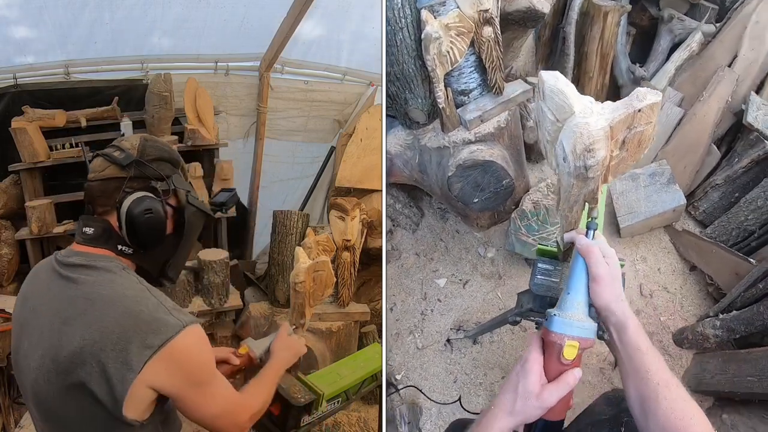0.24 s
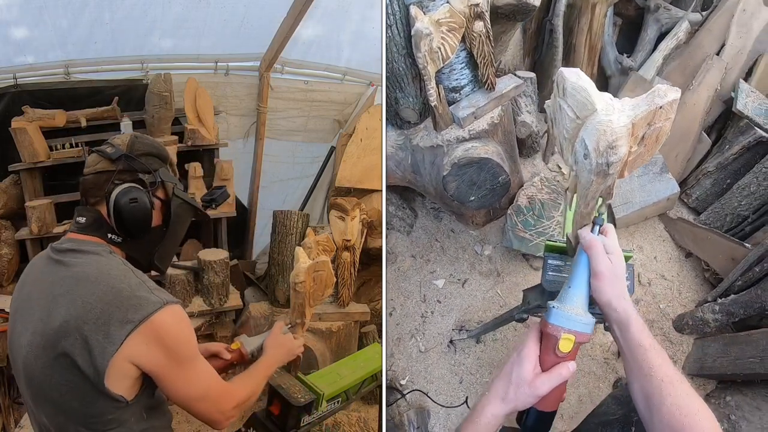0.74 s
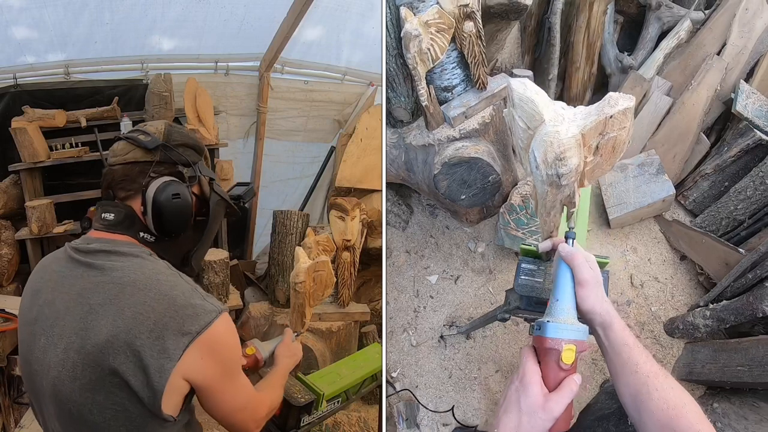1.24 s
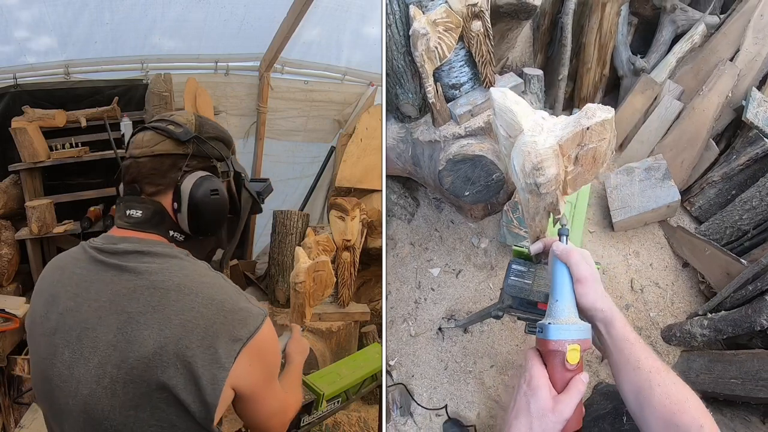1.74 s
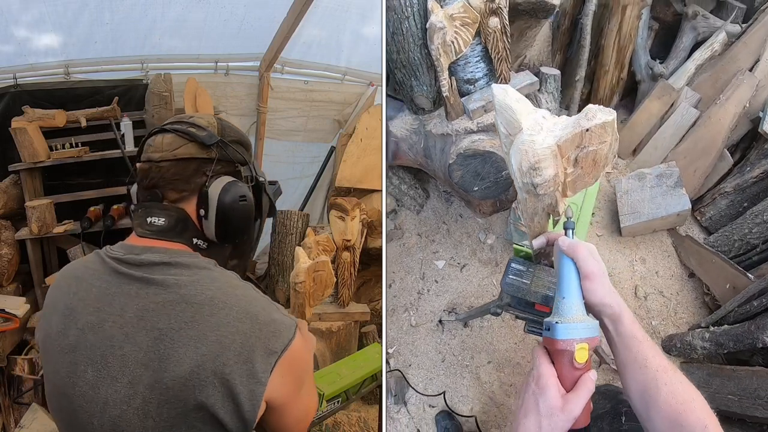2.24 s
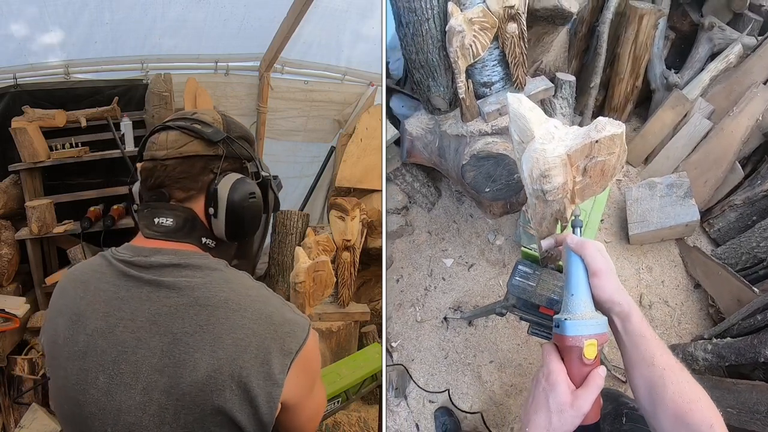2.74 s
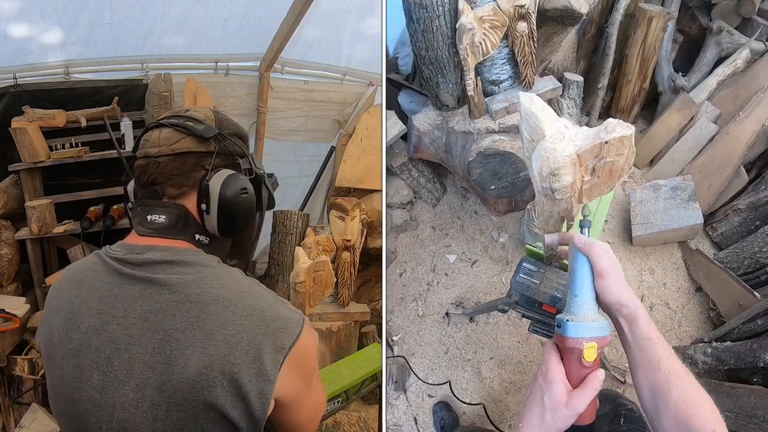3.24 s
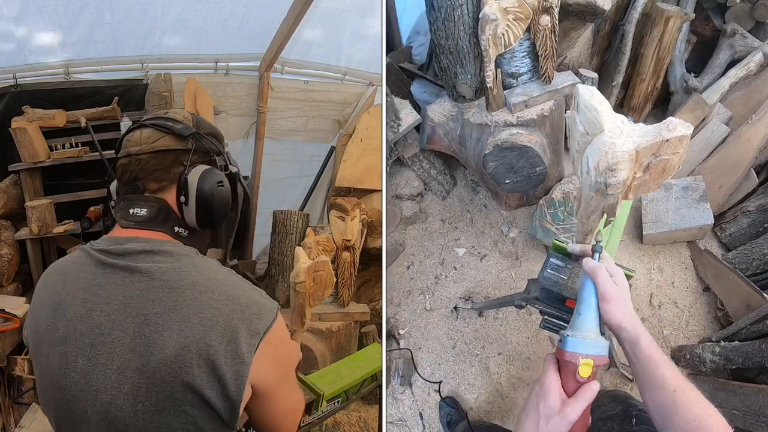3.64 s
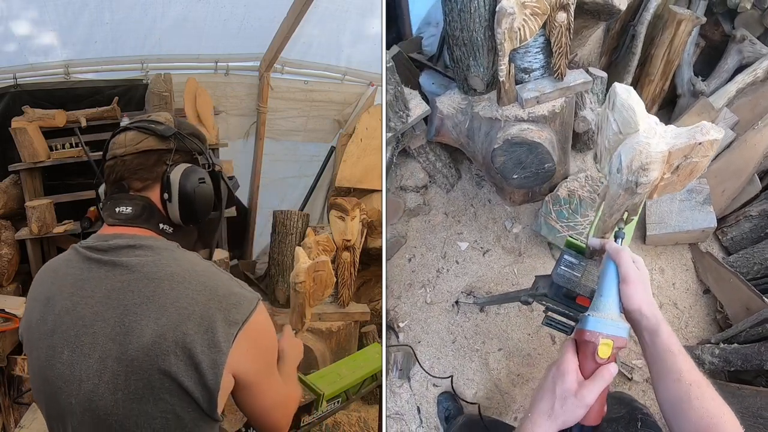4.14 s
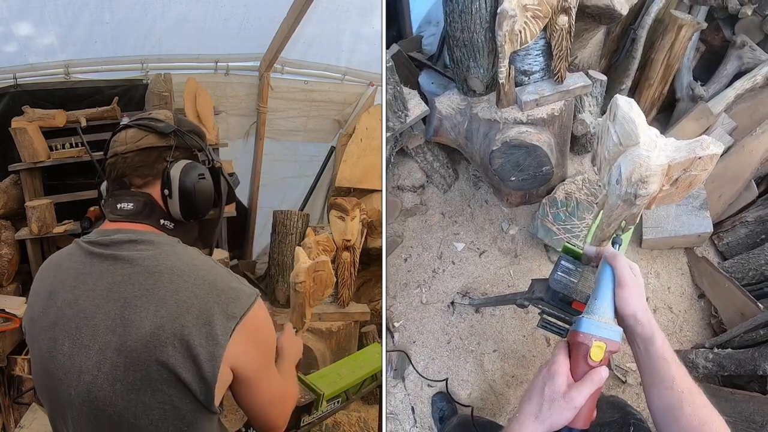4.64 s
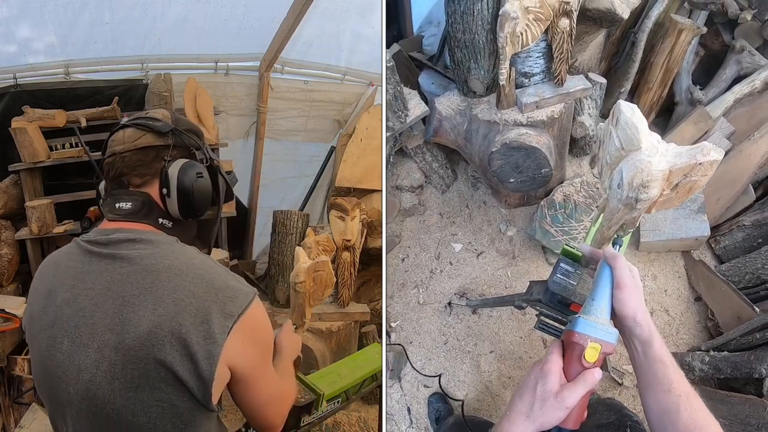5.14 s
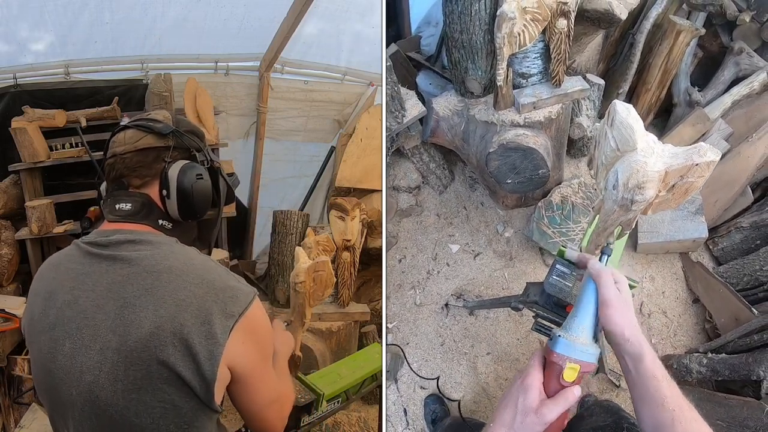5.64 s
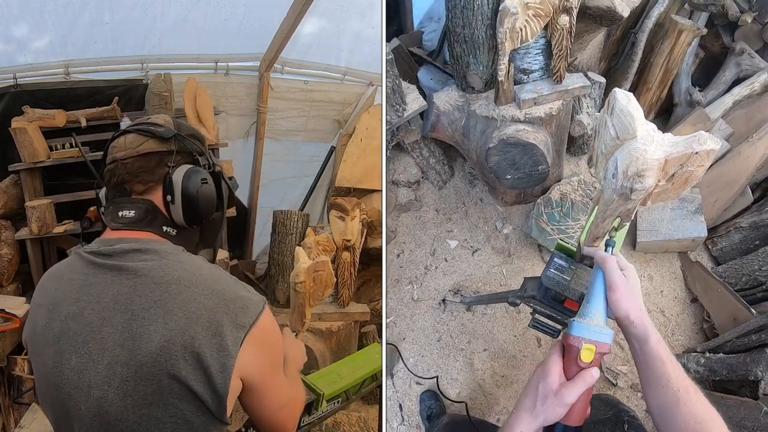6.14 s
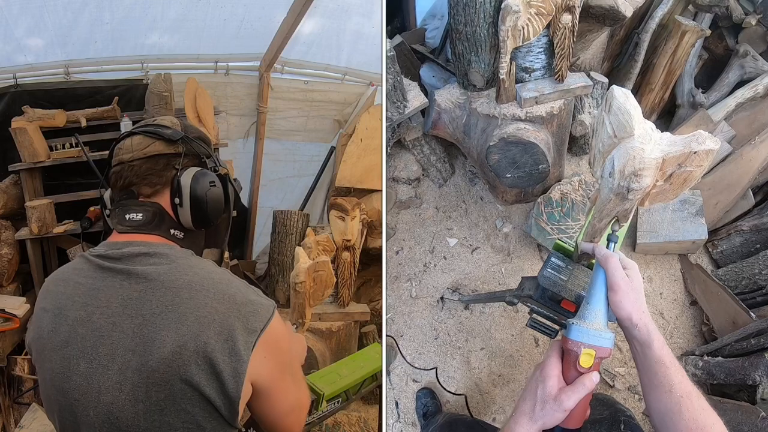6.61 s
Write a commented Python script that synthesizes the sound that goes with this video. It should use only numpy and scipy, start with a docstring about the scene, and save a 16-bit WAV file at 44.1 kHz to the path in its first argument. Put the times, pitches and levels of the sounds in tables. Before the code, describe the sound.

An electric die grinder carves wood close by in a workshop tent, running without a break: a steady motor hum under a hiss of rushing air and rasping dust. Quick, shrill bites of the burr sound in the first half second. From about 1.1 to 2.1 seconds come loud, stuttering bites that sing with a high whine. Lighter, thin chatter follows until about 4 seconds, the pitch sagging near 3 seconds and climbing back. From 4 to 5.3 seconds short bites merge into a long cut that drags the pitch to its lowest. The motor runs more freely and recovers, then a sharp bite at 6 seconds starts a series of short ones lasting to the end, near 6.9 seconds. The whole sound dips slightly under each loud bite.

```python
"""An electric die grinder carves wood in a workshop tent. From the start its shaft hums, cooling air rushes
through the casing, and each bite of the six-fluted burr (the cutter) sings at multiples of the turning
rate, mostly the sixth. Loud bites come at 1-2 s, then light chatter as the speed sags under load and
recovers. A long cut at 4-5.3 s slows the shaft most; short bites follow from about 6 s. Throughout, an
automatic gain control turns the sound down under each loud bite."""
import sys
import numpy as np
from scipy import signal
from scipy.fft import rfft, irfft, next_fast_len
from scipy.io import wavfile
from scipy.ndimage import uniform_filter1d

SR = 44100
rng = np.random.default_rng(int(sys.argv[2]) if len(sys.argv) > 2 else 0)


def wav_out(sig):
    """Save sig, one row per channel (or a flat mono array), as 16-bit PCM at SR to the path in sys.argv[1]."""
    wavfile.write(sys.argv[1], SR, np.round(np.clip(np.atleast_2d(sig).T, -1, 1) * 32767).astype(np.int16))


N = 302967
STEP = 40  # samples between the points of a slow control curve
TIMES = np.arange(N // STEP + 2) * STEP / SR  # those points, in seconds

# rush of air and dust: (time [s], low range [dB], middle range [dB], high range [dB])
AIR_LEVELS = [(0.0, -42.5, -38.5, -38.5), (.3, -39, -34, -37), (.55, -40, -35.5, -38.5),
              (.76, -42, -38.5, -41), (1.09, -38.5, -35, -36.5), (1.14, -40.5, -34, -34.5),
              (1.3, -38, -33.5, -35), (1.9, -40, -35.5, -37), (2.3, -41, -37.5, -39.5),
              (2.7, -41.5, -38.5, -39.5), (3.0, -39, -37.5, -39), (3.4, -40, -38, -39.5),
              (3.85, -38, -35.5, -37.5), (4.36, -38, -33.5, -35), (4.45, -40, -35.5, -37.5),
              (4.9, -41, -39.5, -39.5), (5.2, -41, -37.5, -38), (5.42, -42, -39, -40.5),
              (5.62, -42.5, -41.5, -43.5), (5.93, -41.5, -36.5, -37.5), (6.4, -40.5, -36.5, -38.5),
              (6.87, -41, -37.5, -39)]


def amp(db):
    """Turn decibels into a gain to multiply by."""
    return 10 ** (np.asarray(db) / 20)


def in_time(rows):
    """Join the rows of a table with straight lines: one control curve for each column after the time."""
    times, *columns = np.transpose(rows)
    return [np.interp(TIMES, times, column) for column in columns]


def at_hz(points, hz):
    """Read a table of (frequency, value), giving each octave equal room."""
    known_hz, values = np.transpose(points)
    return np.interp(np.log(hz), np.log(known_hz), values)


def per_sample(control):
    """Fill in a control curve so that every sample has a value."""
    return np.interp(np.arange(N) / STEP, np.arange(len(TIMES)), control)


def drift(rate):
    """A random curve of typical size 1 that changes about `rate` times a second."""
    r = np.exp(-2 * np.pi * STEP * rate / SR)
    slow = signal.lfilter([1], [1, -2 * r, r * r], rng.standard_normal(len(TIMES) + 2000))[2000:]
    return slow / np.sqrt(np.mean(slow ** 2))


def swell(middle, length):
    """A curve that rises to 1, stays flat and falls again."""
    return np.exp(-(2 * (TIMES - middle) / length) ** 4)


def casing_db(hz):
    """The casing resonates: it boosts sound near certain frequencies."""
    # resonances: (frequency [Hz], width [Hz], boost [dB])
    resonances = [(770, 90, 8), (1060, 90, 4), (1360, 110, 5), (1670, 100, 4), (2090, 90, 3),
                  (2900, 900, 3), (8100, 450, 4), (9650, 400, 3)]
    return sum(db / (1 + (2 * (hz - centre) / width) ** 2) for centre, width, db in resonances)


def air_spectra(hz, size):
    """Left and right spectra of swirling air: random noise coloured by the casing."""
    # colour of the rush: (frequency [Hz], relative level [dB])
    colour = [(25, -39.5), (80, -32), (130, -34.5), (400, -26.5), (540, -27), (640, -22), (1000, -16),
              (3300, -14), (4800, -7.5), (6400, -8), (8000, -6.5), (9900, -11.5), (10500, -21),
              (11300, -19), (13000, -25), (13300, -28), (14800, -33)]
    # how alike left and right are: (frequency [Hz], likeness [0 to 1])
    likeness = [(60, 0.98), (130, 0.85), (290, 0.89), (630, 0.7), (1380, 0.4), (3010, 0.84), (6590, 0.17),
                (14400, 0.055)]
    # which side is louder: (frequency [Hz], left minus right [dB])
    balance = [(60, 1), (130, -0.5), (290, -0.5), (630, -2), (1380, -2.5), (3010, 0), (6590, -1),
               (14400, 1)]
    shared, apart = rfft(rng.standard_normal((2, size))) * amp(at_hz(colour, hz) + casing_db(hz))
    alike = at_hz(likeness, hz)
    shared, apart = np.sqrt(1 + alike) * shared, np.sqrt(1 - alike) * apart
    lean = amp(at_hz(balance, hz) / 2)
    return np.array([(shared + apart) * lean, (shared - apart) / lean])


def air_rush(flicker_db=1.37, top_share=0.63):
    """Rushing air and rasping dust over a low rumble, in half-octave bands that each flicker."""
    # rumble of the surroundings: (time [s], level [dB])
    rumble = [(0.0, -63.5), (2.5, -67.5), (4.0, -66), (6.87, -72)]
    # extra fullness of the rasp near 0.6-1.1 and 3.2 kHz: (time [s], boost [dB])
    body = [(1.1, 3.5), (1.3, 0.5), (6.87, 1)]
    body_db, = in_time(body)
    _, _, top_db = strokes()
    size = next_fast_len(N)
    hz = np.maximum(np.fft.rfftfreq(size, 1 / SR), 1)
    spectra = air_spectra(hz, size)
    band_position = np.clip(2 * np.log2(hz / 200), 0, 12)
    ranges, split_hz = np.zeros((4, 2, N)), (220, 2100, 4300)  # rumble, low, middle, high
    common_flicker = 0.13 * drift(20)
    for k in range(13):
        band = irfft(spectra * np.maximum(1 - np.abs(band_position - k), 0), size)[:, :N]
        band_db = flicker_db * (common_flicker + drift(22.4))
        band_db += top_share * top_db * (k == 12) + body_db * (k in (3, 4, 5, 8))
        ranges[np.searchsorted(split_hz, 200 * 2 ** (k / 2))] += band * per_sample(amp(band_db))
    rumble_db = in_time(rumble)[0] + 0.41 * drift(17)
    # a clean, singing cut takes the place of some of the rasp
    rasp_db = [db - share * singing_db() for db, share in zip(in_time(AIR_LEVELS), (0.03, 0.12, 0.09))]
    return sum(per_sample(amp(db)) * noise / np.std(noise.mean(0))
               for db, noise in zip([rumble_db, *rasp_db], ranges))


def wood_hum():
    """The clamped piece of wood hums briefly at a low resonance."""
    # hums: (middle [s], length [s], pitch [Hz], level [dB])
    hums = [(0.31, 0.056, 343, -56.5), (1.785, 0.15, 356, -55), (5.198, 0.33, 357, -56.5)]
    t = np.arange(N) / SR
    return sum(np.sqrt(2) * amp(db) * per_sample(swell(middle, length)) * np.sin(2 * np.pi * hz * t)
               for middle, length, hz, db in hums)


def shaft_hz():
    """The turning rate, which sags under load and recovers."""
    # shaft speed: (time [s], turns per second [Hz])
    speed = [(0.0, 464), (0.2, 464.7), (0.47, 467.6), (0.6, 469.8), (0.99, 481.3), (1.13, 483.3),
             (1.4, 481), (1.87, 472.5), (2.14, 474.2), (2.36, 479.2), (2.52, 474.4), (2.82, 457.4),
             (3.01, 451.6), (3.15, 456), (3.42, 471), (3.66, 479.8), (3.95, 485.9), (4.26, 487.3),
             (4.4, 483), (4.76, 456.9), (5.08, 447.6), (5.29, 438), (5.46, 443.3), (5.72, 463.4),
             (5.93, 474.3), (6.18, 479.6), (6.47, 478.1), (6.87, 481)]
    return in_time(speed)[0]


def shaft_tone(multiple, gain, lean_db, waver_db, flutter_rad, roam_rad=0.35):
    """A wavering tone at a multiple of the turning rate; lean_db is left minus right."""
    hz = multiple * shaft_hz()
    peak = np.sqrt(2) * gain * amp(waver_db * drift(20))
    phase = 2 * np.pi * np.cumsum(hz) * STEP / SR
    phase += flutter_rad * drift(20) + rng.uniform(0, 2 * np.pi)
    # reflections put left and right out of step, more so for high tones
    phase_gap = 0.29 + np.minimum(hz / 6500, 1) ** 2 * (1 + roam_rad * drift(3))
    return np.array([per_sample(peak * amp(side * lean_db)) * np.sin(per_sample(phase - side * phase_gap))
                     for side in (0.5, -0.5)])


def flare_up(multiple, gain):
    """Raise a tone's gain at the moments when it briefly stands out."""
    # flares: (middle [s], length [s], multiple of the turning rate, level [dB])
    flares = [(0.194, .08, 14, -44), (0.301, 0.12, 14, -39), (0.47, .1, 14, -40), (0.21, 0.077, 11, -43),
              (.375, .025, 16, -36), (.4, 0.039, 11, -43), (.31, .1, 11, -47), (0.592, 0.012, 9, -33),
              (1.248, 0.19, 10, -42.5), (1.2, 0.15, 15, -42), (1.195, .05, 12, -37), (1.42, .06, 17, -38),
              (1.5, .04, 17, -41), (1.6, 0.038, 17, -36), (4.47, .1, 11, -43), (4.777, .25, 16, -41),
              (4.797, 0.087, 21, -43), (1.212, 0.1, 13, -41), (1.53, 0.12, 16, -38), (1.725, .045, 16, -39),
              (1.813, 0.1, 16, -40), (2.055, 0.027, 16, -39), (2.303, .045, 9, -41.5), (2.586, .1, 17, -43),
              (2.775, 0.18, 20, -46), (2.83, 0.041, 18, -37), (3.066, 0.039, 18, -36.5),
              (3.895, 0.22, 11, -45.5), (1.949, 0.015, 9, -31), (1.967, 0.011, 3, -35.5),
              (1.588, 0.055, 9, -38.5), (2.933, 0.048, 16, -40), (4.038, 0.04, 16, -32.5),
              (4.04, 0.034, 15, -38), (4.25, 0.02, 12, -33), (4.392, .03, 11, -35), (4.368, 0.041, 16, -31),
              (4.467, .07, 9, -36), (4.603, 0.14, 9, -37.5), (4.804, 0.16, 9, -43),
              (4.708, 0.14, 18, -37.5), (4.83, 0.044, 18, -39), (4.932, 0.61, 11, -45),
              (4.986, 0.16, 16, -44), (5.025, .25, 18, -44), (5.04, .08, 22, -45), (5.045, .07, 17, -48),
              (5.055, .06, 13, -44), (5.222, 0.055, 18, -40), (5.257, .07, 15, -37.5),
              (5.196, 0.067, 13, -39), (5.902, 0.048, 9, -40), (5.98, 0.031, 14, -34),
              (5.975, 0.023, 9, -33), (6.0, .02, 11, -32), (6.185, 0.05, 9, -36), (6.195, .1, 12, -42),
              (6.205, .035, 20, -41), (6.443, 0.021, 13, -38), (6.15, .09, 10, -46), (6.15, .07, 13, -47),
              (6.28, .15, 10, -46), (6.67, .04, 13, -46), (6.77, .07, 10, -49), (6.39, .05, 13, -45),
              (6.43, .03, 12, -42), (6.55, .08, 10, -46), (6.696, .07, 12, -45), (6.147, 0.056, 16, -28),
              (6.266, 0.084, 17, -38), (6.347, 0.043, 16, -32.5)]
    for middle, length, k, db in flares:
        if round(k) == multiple:
            gain = np.maximum(gain, amp(db) * swell(middle, length))
    return gain


def fan_whistle(multiple=27, vent_hz=13050, width_hz=1200):
    """The fan blades whistle faintly, best near a resonance of the vent."""
    high_rush_db = in_time(AIR_LEVELS)[-1]
    off_resonance = 2 * (multiple * shaft_hz() - vent_hz) / width_hz
    gain = amp(high_rush_db - 21) / (1 + off_resonance ** 2)
    return shaft_tone(multiple, gain, lean_db=3, waver_db=2, flutter_rad=0.2, roam_rad=0.2)


def motor_hum(third_db=-52):
    """The slightly unbalanced shaft shakes once a turn: a hum with its 2nd to 4th multiples."""
    # motor tones: (time [s], hum [dB], 2nd multiple [dB], 4th multiple [dB])
    motor_levels = [(0.0, -51.5, -48, -67), (.2, -44, -41, -44), (0.52, -38.5, -40.5, -65),
                    (0.58, -48, -51, -46.5), (1.07, -45.5, -48.5, -47), (1.3, -48, -46.5, -50),
                    (1.9, -48, -52, -51), (2.79, -48, -47.5, -48), (3.08, -43.5, -52, -50.5),
                    (3.81, -44, -49.5, -43.5), (4.59, -50.5, -51.5, -49), (5.07, -44, -57.5, -45.5),
                    (5.37, -45, -53, -51), (5.9, -47.5, -51.5, -73), (6.87, -47, -46, -50)]
    hum, second, fourth = in_time([(time, *amp(levels_db)) for time, *levels_db in motor_levels])
    sound = shaft_tone(1, hum, lean_db=1.5, waver_db=1.13, flutter_rad=0.011)
    for k, gain in ((2, second), (3, flare_up(3, amp(third_db))), (4, fourth)):
        sound += shaft_tone(k, gain, lean_db=-1.6 + 1.3 * drift(2.2), waver_db=3.5, flutter_rad=0.5)
    return sound


def strokes():
    """The burr strokes along the wood: curves in dB for its light touch, chatter and extra treble."""
    # strokes: (start [s], end [s], touch between bites [dB], chatter boost [dB], treble boost [dB])
    contacts = [(0.0, 0.548, -58, -4, 0), (1.107, 1.348, -41, 1.5, 0), (1.36, 1.89, -47, -1, 2),
                (1.943, 2.18, -57, -2.5, -0.5), (2.397, 3.18, -51, -0.5, 5), (3.2, 3.95, -52, -3.5, 2),
                (3.952, 4.375, -52, -1, 2.5), (4.35, 4.798, -44, 1, 2.5), (4.794, 5.305, -45, 1, 3),
                (5.962, 6.008, -38, 10, 0), (6.11, 6.466, -45.5, 0, 5), (6.468, 6.9, -57, -3.5, 0)]
    levels_db = np.outer([-57, -9, 0], np.ones(len(TIMES)))  # the levels between strokes
    for start, end, *stroke_db in contacts:
        levels_db[:, (TIMES >= start) & (TIMES < end)] = np.c_[stroke_db]
    return uniform_filter1d(levels_db, size=15)


def burr_chatter(gains, bite_share=0.23, wander_db=2.6):
    """High multiples come and go as the contact wanders over the flutes, and rise with each bite."""
    # one value for each multiple from the 9th upward: (base level [dB])
    chatter_levels = [-51, -54, -55, -55.5, -55.5, -58, -57.5, -54.5, -56.5, -57.5, -60, -58, -60.5, -65,
                      -67, -69, -70, -71, -72]
    touch_db, boost_db, top_db = strokes()
    bite_rise = sum(gains.values()) / len(gains) / amp(touch_db)
    strength = amp(boost_db) * bite_rise ** bite_share
    sound = np.zeros((2, N))
    for k, base_db in enumerate(chatter_levels, 9):
        level_db = base_db + casing_db(k * shaft_hz()) + top_db * min((k - 9) / 12, 1)
        gain = flare_up(k, strength * amp(level_db + wander_db * drift(9)))
        sound += shaft_tone(k, gain, lean_db=-1.6 + 1.3 * drift(2.2), waver_db=1.9, flutter_rad=0.25)
    return sound


def bite_power(ring_s=0.0098, fall_db=19):
    """Power of the 5th to 8th multiples: each bite swells around its leading multiple and rings out."""
    # bites into the wood: (middle [s], length [s], level [dB], leading multiple of the turning rate)
    bites = [(0.038, 0.073, -32.5, 6), (.158, .045, -39, 5.6), (.05, 0.13, -42, 5),
             (0.124, 0.028, -30, 5.8), (0.198, 0.079, -33.5, 5), (0.258, 0.046, -31, 6),
             (0.292, .04, -36, 5), (0.397, .07, -40, 5), (0.34, 0.075, -29.5, 5.8),
             (0.407, 0.013, -27.5, 5.8), (0.438, 0.059, -22, 5.45), (0.48, 0.022, -30, 5.9),
             (0.52, 0.011, -28.5, 6), (1.13, 0.016, -16, 6.3), (1.17, 0.025, -20.5, 6.2),
             (1.22, 0.04, -37, 8), (1.25, 0.097, -19.5, 5.8), (1.308, 0.022, -32.5, 8),
             (1.359, 0.031, -18, 5.8), (1.433, 0.14, -22, 5.5), (1.445, .05, -37, 8),
             (1.528, 0.071, -28.5, 6), (1.58, 0.12, -38.5, 5), (1.596, 0.027, -24.5, 6),
             (1.658, 0.042, -26.5, 6), (1.764, 0.13, -23.5, 5.7), (1.863, 0.05, -28, 5.5),
             (1.959, 0.02, -30.5, 5), (1.983, 0.027, -24.5, 6), (2.069, 0.07, -20.5, 6.2),
             (2.12, 0.04, -31, 6), (2.297, 0.019, -34.5, 6), (3.014, 0.085, -41, 5), (3.964, .02, -35.5, 6),
             (4.02, .03, -40, 5), (4.022, 0.014, -39, 8), (4.045, 0.023, -30, 6), (4.072, 0.025, -35, 6),
             (4.167, .03, -35, 6.5), (4.256, 0.015, -25.5, 6.2), (4.305, 0.013, -30, 6),
             (4.352, .02, -33, 8), (4.377, 0.01, -25, 6), (4.409, 0.032, -23, 5.4), (4.403, 0.018, -27, 8),
             (4.442, 0.077, -27, 6), (4.446, 0.063, -36, 7), (4.49, 0.16, -37, 5), (4.562, 0.16, -43, 8),
             (4.578, .1, -40, 7), (4.722, .045, -33.5, 8), (4.643, 0.29, -24, 6), (4.632, 0.057, -30.5, 5),
             (4.81, 0.12, -24.5, 6.3), (4.918, 0.12, -21, 6.5), (5, 0.18, -28, 7.2), (5.1, 0.11, -36, 6),
             (5.167, 0.13, -38, 8), (5.226, 0.16, -40, 6), (5.145, 0.064, -27, 7.3),
             (5.227, 0.073, -25, 7.2), (5.88, 0.0098, -30, 5.1), (5.993, 0.02, -14.5, 6.5),
             (6.12, 0.023, -36, 5.3), (6.163, 0.068, -24, 7.9), (6.27, 0.15, -46, 7), (6.64, .14, -52, 7),
             (6.273, 0.062, -36, 5), (6.37, 0.017, -33, 5), (6.177, 0.02, -30, 6), (6.131, 0.024, -34.5, 6),
             (6.235, 0.017, -28.5, 6), (6.29, 0.054, -30, 6.1), (6.267, 0.13, -35, 8),
             (6.393, 0.029, -27, 5.9), (6.447, 0.023, -23.5, 5.6), (6.56, 0.1, -31, 5.2),
             (6.536, 0.04, -42, 6), (6.582, 0.021, -33, 6), (6.65, 0.055, -44, 6), (6.696, 0.033, -33, 6),
             (6.798, 0.05, -33.5, 5.5), (6.86, 0.023, -27, 6)]
    power = dict.fromkeys(range(5, 9), 1e-12)
    decay = np.exp(-STEP / (ring_s * SR))
    for middle, length, level_db, lead in bites:
        shape = swell(middle, length) ** 2
        shape = np.maximum(shape, signal.lfilter([1 - decay], [1, -decay], shape))
        for k in power:
            power[k] += shape * amp(level_db - fall_db * abs(k - lead)) ** 2
    return power


def singing_db(threshold_db=-42):
    """How far the bites rise above the level where the cut starts to sing cleanly."""
    power = uniform_filter1d(sum(bite_power().values()), size=60)
    return np.maximum(10 * np.log10(power + 1e-12) - threshold_db, 0)


def bite_gains(stutter_db=1.3):
    """Gain of each singing multiple: bites plus the light touch, stuttering as the burr grabs and slips."""
    touch_db, _, _ = strokes()
    power = {k: bite + amp(touch_db + 2.5 * drift(12)) ** 2 for k, bite in bite_power().items()}
    common_stutter = amp(stutter_db * drift(60))
    return {k: common_stutter * amp(stutter_db * drift(30)) * np.sqrt(power[k]) for k in power}


def burr_song(gains):
    """Six flutes (cutting edges) strike the wood each turn; being uneven, they sound nearby multiples too."""
    sound = np.zeros((2, N))
    for k, gain in gains.items():
        # a light touch skips and breaks the tone up, a firm cut holds it steady
        waver_db = 0.8 + 4 / (1 + (gain / amp(-49)) ** 2)
        sound += shaft_tone(k, gain, lean_db=-2.8, waver_db=waver_db, flutter_rad=0.12)
    return sound


def gain_control(sound, threshold_db=-32.5, share=0.46, attack_s=0.004, release_db_per_s=21):
    """Loudness above the threshold pulls the gain down quickly; it creeps back at a steady rate."""
    level_db = 10 * np.log10(uniform_filter1d(np.mean(sound ** 2, axis=0), size=441) + 1e-12)
    cut_db = share * np.maximum(level_db - threshold_db, 0)
    release_db = release_db_per_s * np.arange(N) / SR
    held_db = np.maximum.accumulate(cut_db + release_db) - release_db
    r = np.exp(-1 / (attack_s * SR))
    return sound * amp(-signal.lfilter([1 - r], [1, -r], held_db))


def scene():
    """The tones of motor, burr and fan, with rushing air and humming wood, in stereo."""
    gains = bite_gains()
    grinder = motor_hum() + burr_chatter(gains) + burr_song(gains) + fan_whistle()
    return grinder + air_rush() + wood_hum()


def record(dry):
    """Turn the loud moments down and cut the treble above 15 kHz."""
    low_pass = signal.cheby2(20, 60, 15000, fs=SR, output="sos")
    return signal.sosfilt(low_pass, gain_control(dry))


dry = scene()
out = record(dry)
wav_out(out)
```